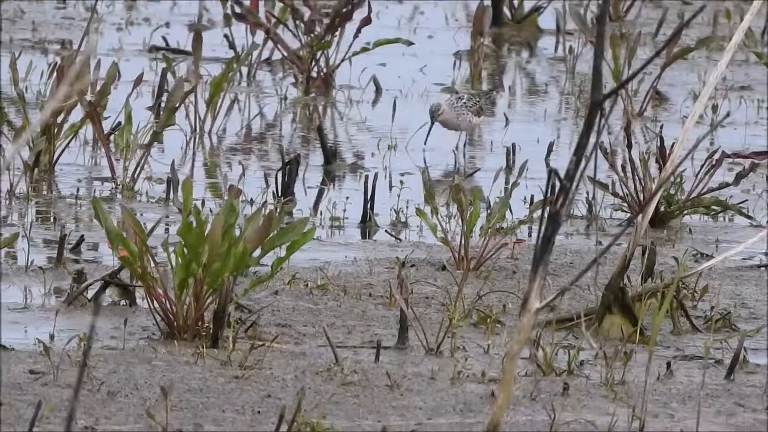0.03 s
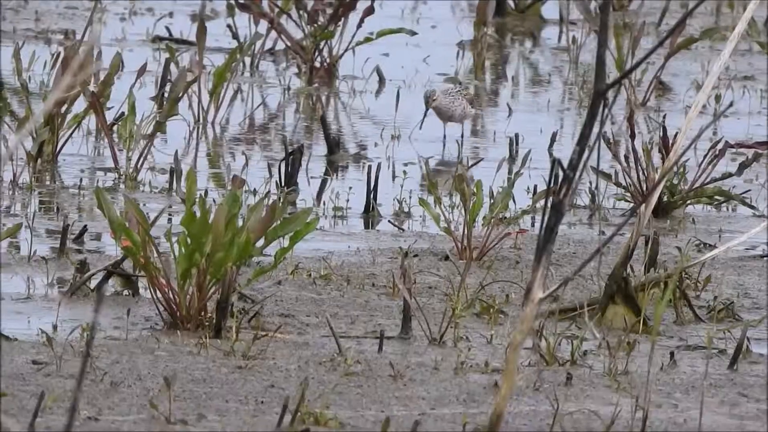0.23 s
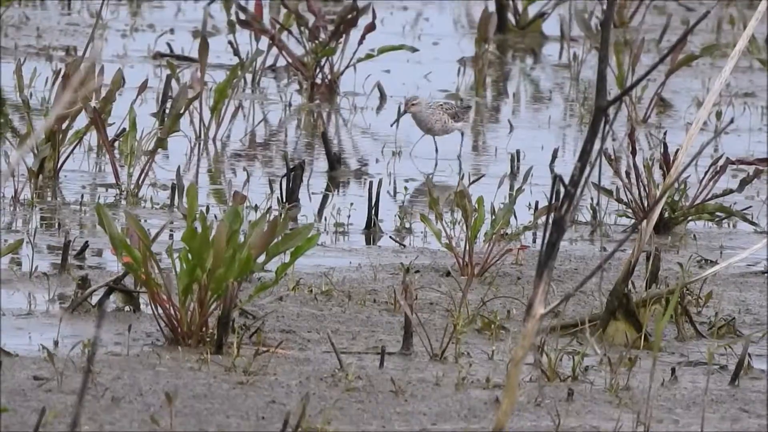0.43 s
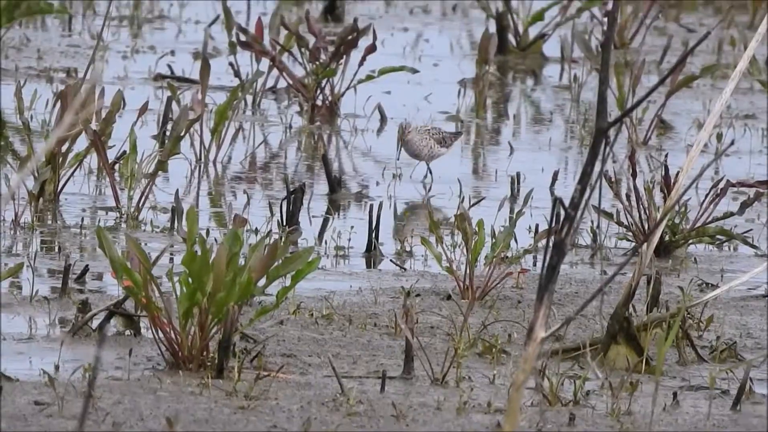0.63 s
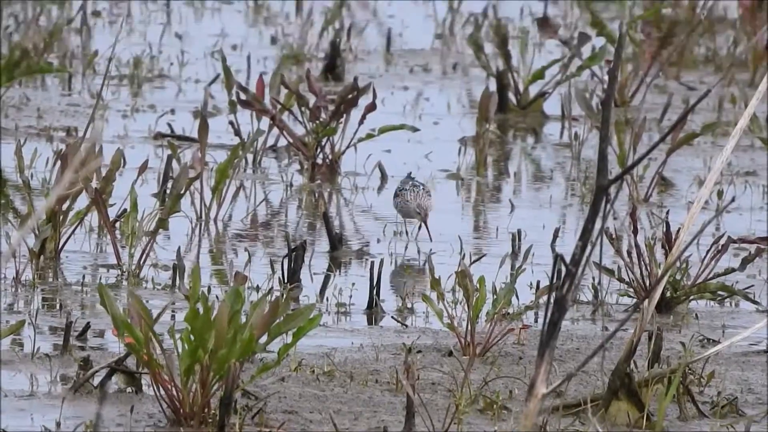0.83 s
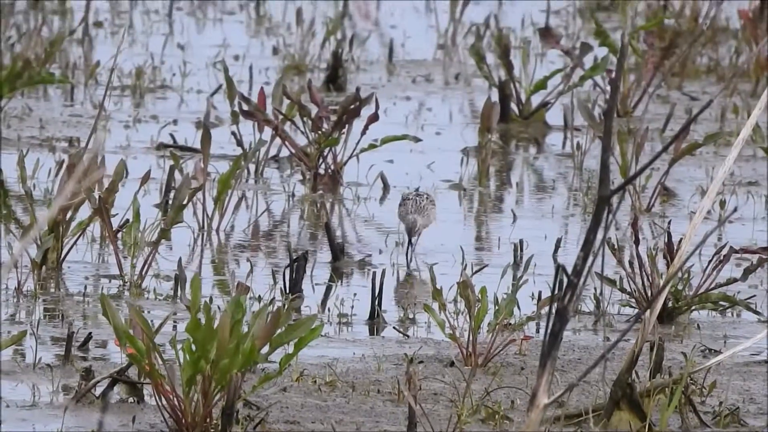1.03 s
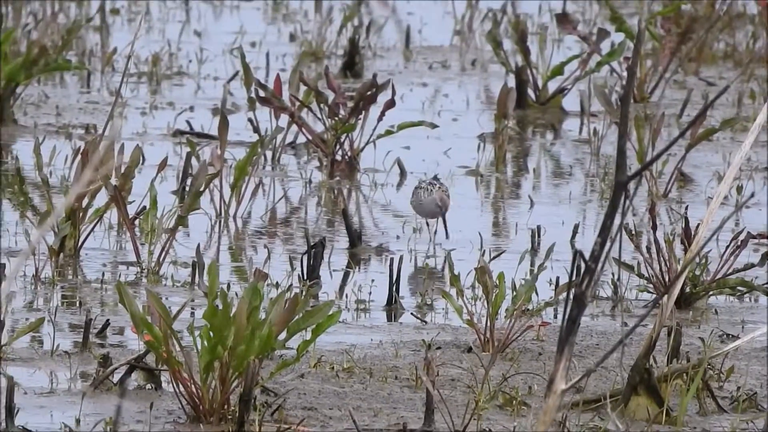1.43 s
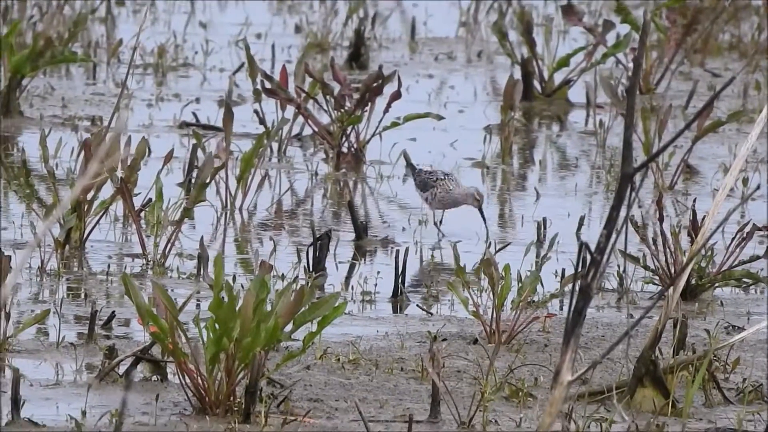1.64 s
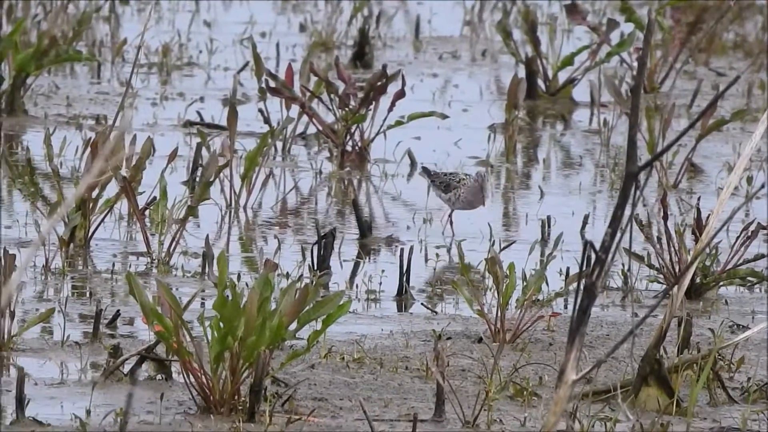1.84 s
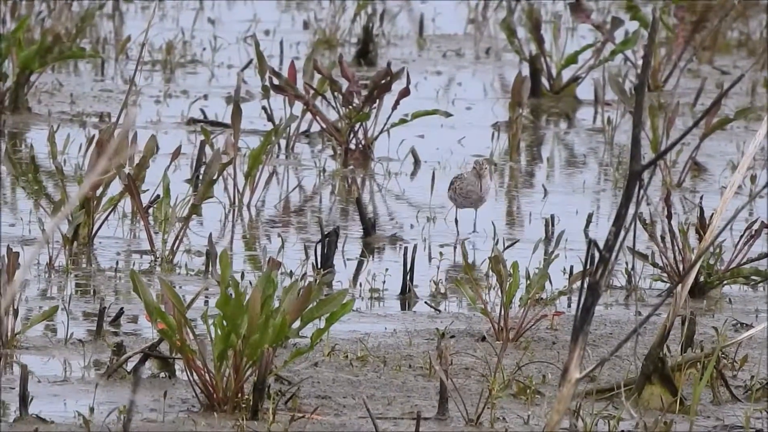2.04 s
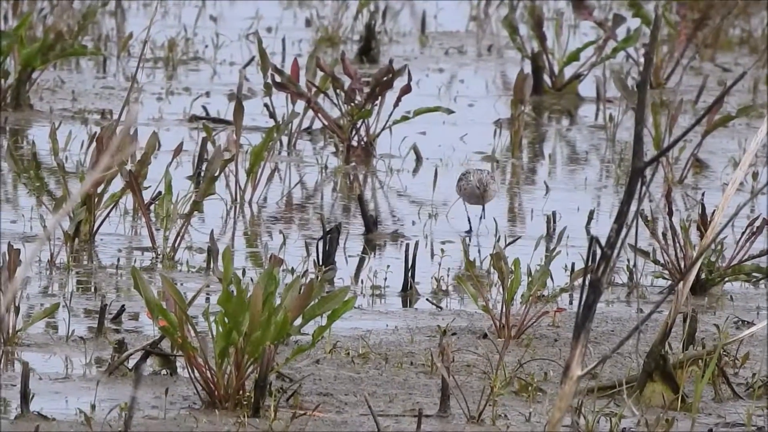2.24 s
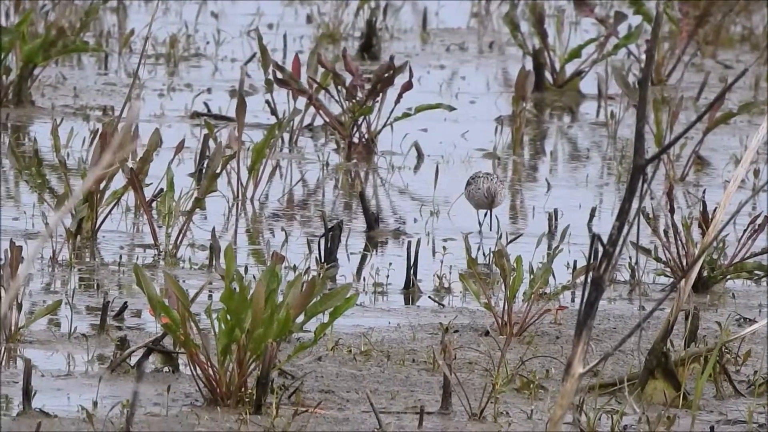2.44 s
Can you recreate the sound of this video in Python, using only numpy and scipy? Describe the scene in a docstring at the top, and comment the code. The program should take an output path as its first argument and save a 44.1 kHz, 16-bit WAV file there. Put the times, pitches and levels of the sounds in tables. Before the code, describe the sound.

A shorebird repeats a yip and a falling wail over wind buffeting the microphone.

```python
"""Shorebird at a windy marsh edge

A shorebird repeats a two-part call: a short arched yip, then a long wail that hiccups and slides down.
Its voice splits briefly near the top of the notes; reeds scatter a soft echo and other birds whistle
far off. Wind buffets the two microphone ports over a distant roar and a faint engine drone."""
import sys
import numpy as np
from scipy import signal
from scipy.fft import rfft, irfft, next_fast_len
from scipy.io import wavfile
from scipy.ndimage import uniform_filter1d, map_coordinates

SR = 44100
rng = np.random.default_rng(int(sys.argv[2]) if len(sys.argv) > 2 else 0)


def generate_wav(sig):
    """Save sig (samples, or channels by samples) to the path in sys.argv[1] as 16-bit PCM at SR."""
    pcm = np.round(np.clip(np.atleast_2d(sig).T, -1, 1) * 32767).astype(np.int16)
    wavfile.write(sys.argv[1], SR, pcm)


N = 114660

# Stereo spread of the voice, one per partial: (share of the note's pan [ratio])
PARTIAL_PAN = [0.51, 1.42, 0.58, -0.63, 1.3]
JITTER, YIP_JITTER, SHIMMER_DB = .0105, .014, 2.2  # roughness in pitch [ratio] and in level
def voice(pitch, gains, pan_db, jitter):
    """Four rough harmonics and, when the voice splits, a partial halfway between the second and third."""
    on = np.flatnonzero(gains[1] > 0)
    def flutter(rate):
        return np.interp(clock()[on] * rate, np.arange(2000), rng.standard_normal(2000))
    phase = 2 * np.pi * np.cumsum(pitch[on] * (1 + jitter * flutter(400))) / SR
    out = np.zeros((2, N))
    for ratio, gain, share in zip((1, 2, 3, 4, 2.5), gains, PARTIAL_PAN):
        level = np.sqrt(2) * gain[on] * amp(SHIMMER_DB * flutter(250))
        out[:, on] += panned(share * pan_db) * level * np.sin(ratio * phase)
    return out


# Yips: (start [s], length [s], peak time [s], peak pitch [Hz], second partial [dB], fundamental [dB],
# third partial [dB], split [dB], pan left [dB], tail [dB], pitch drop half a note from the peak [ratio])
YIPS = [(0.032, 0.037, .047, 2424, -51.5, -63, -56.5, -56, 5.5, -69, .09),
        (0.55, 0.037, .565, 2293, -46, -59.5, -48.5, -50, 6.5, -51, 0.097),
        (1.047, 0.037, 1.064, 2318, -39, -60, -46.5, -43, 7.5, -62, 0.088),
        (1.551, 0.034, 1.572, 2217, -50, -56, -62, -79, 5, -60, .06),
        (2.044, 0.05, 2.078, 2184, -48, -56.5, -59.5, -75, 3, -75, .07),
        (2.519, 0.057, 2.554, 2078, -46, -55, -60.5, -78, -2.5, -51, 0.059)]
TAIL_HZ, TAIL_S, TAIL_FADE_DB = 3785, 0.058, 8.5
def yips():
    """Each scratchy yip arches over its peak, where it splits, then dulls and trails off in a thin tone."""
    out = np.zeros((2, N))
    for start, length, peak_s, peak_hz, second_db, root_db, third_db, split_db, pan, tail_db, drop in YIPS:
        from_peak = (clock() - peak_s) / length
        arch = np.minimum((2 * from_peak) ** 2, 2)
        env = gate(start - .003, start + length + .007, edge=.012)
        second = amp(second_db - 4.9 * arch)
        third = amp(third_db - 4.5 * np.clip(from_peak, -1, 1))
        split = amp(split_db) * bell(peak_s + .0045, .0083)
        gains = [amp(root_db), second, third, third * amp(-18), split]
        out += voice(peak_hz * (1 - drop * arch), [env * g for g in gains], pan, YIP_JITTER)
        end = start + length + .0037
        fade_db = TAIL_FADE_DB * np.clip((clock() - end) / TAIL_S, 0, 1)
        tail = gate(end, end + TAIL_S, edge=.0054) * amp(tail_db - fade_db)
        out += panned(pan) * tail * tone(TAIL_HZ * (1 + JITTER * wobble(300)))
    return out


# One contour per wail: (time [s], pitch [Hz], second partial [relative dB], third partial [relative dB])
WAIL_CONTOURS = [
    [(0.178, 2331, -54, -65), (0.192, 2439, -43.5, -59), (0.208, 2320, -53.5, -55), (0.23, 2377, -58, -53),
     (0.244, 2290, -55, -55), (0.27, 2297, -47, -63), (0.288, 2260, -54, -50.5), (0.314, 2164, -59, -64),
     (0.336, 2048, -60, -57), (0.356, 1920, -50, -51.5), (0.364, 1844, -49.5, -59), (0.378, 1960, -60, -83)],
    [(0.685, 2246, -52, -61), (0.695, 2430, -41.5, -52), (0.717, 2290, -50, -60), (0.735, 2340, -54, -48),
     (0.753, 2308, -47, -48.5), (0.775, 2260, -46, -57), (0.813, 2200, -46.5, -49.5),
     (0.831, 2130, -47, -56), (0.851, 2045, -61, -52), (0.883, 1834, -44, -52.5), (0.9, 1956, -57, -77)],
    [(1.17, 2307, -84, -91), (1.176, 2375, -39, -60), (1.184, 2432, -39, -53), (1.19, 2382, -42, -67),
     (1.202, 2220, -78, -63), (1.216, 2350, -58, -56), (1.224, 2434, -43.5, -54), (1.252, 2258, -45, -65),
     (1.282, 2187, -54.5, -53.5), (1.328, 2165, -53, -60), (1.356, 1976, -63, -55),
     (1.382, 1810, -51, -55.5), (1.398, 1826, -53, -75)],
    [(1.66, 2204, -50, -73), (1.668, 2293, -51, -57), (1.676, 2260, -49, -71), (1.688, 2123, -58, -58),
     (1.7, 2049, -77, -70), (1.72, 2335, -56, -55), (1.74, 2280, -53, -60), (1.756, 2292, -52, -64),
     (1.778, 2210, -58, -62), (1.79, 2087, -52.5, -63), (1.83, 2010, -53.5, -53.5),
     (1.888, 1761, -58.5, -73)],
    [(2.138, 2168, -74, -73), (2.144, 2188, -50, -68), (2.152, 2168, -56, -58), (2.164, 2052, -54, -62),
     (2.176, 1963, -63, -77), (2.186, 2110, -56, -63), (2.198, 2262, -44.5, -48.5), (2.212, 2138, -58, -67),
     (2.242, 2169, -53, -52.5), (2.27, 2155, -54, -60), (2.29, 2057, -46.5, -56), (2.315, 1983, -58, -66),
     (2.352, 1850, -49, -63), (2.382, 1748, -49.5, -78), (2.394, 1870, -58, -82)],
]
# Character of each wail: (fundamental [dB], fourth partial [dB], pan left [dB], hiccup time [s],
# hiccup dip in the fundamental [dB], rasp centre [Hz], rasp level [dB])
WAIL_TIMBRES = [(-63, -67, 7, 0.24, -2, 4880, -51), (-57.5, -65, 7.5, 0.64, 7, 4800, -50),
                (-55, -71.5, 6, 1.204, 3, 4830, -50), (-52, -71, 3, 1.701, 20, 4760, -50),
                (-51, -68, 0.5, 2.175, 9, 4500, -56)]
# Cracks where a wail splits: (time [s], width [s], level [dB])
WAIL_SPLITS = [(0.206, 0.0039, -54), (.23, 0.0066, -58), (.739, 0.0031, -50), (1.227, 0.0039, -43),
               (1.248, 0.014, -49.5), (1.727, 0.004, -53), (1.758, 0.012, -58)]
ROOT_HOLD, ROOT_FADE_DB = 0.52, 22  # share of the note the fundamental holds; then its fall per note length
def wails():
    """Each long note hiccups, may split near its top and slides down hoarsely as its fundamental fades."""
    out = np.zeros((2, N))
    split = sum(amp(db) * bell(s, width) for s, width, db in WAIL_SPLITS)
    for contour, timbre in zip(WAIL_CONTOURS, WAIL_TIMBRES):
        root_db, fourth_db, pan, hiccup_s, hiccup_db, rasp_hz, rasp_db = timbre
        pitch, second_db, third_db = uniform_filter1d(curves(contour), round(.004 * SR), axis=1)
        start, end = contour[0][0], contour[-1][0]
        env = gate(start - .005, end + .006, edge=.015)
        late = np.clip((clock() - start) / (end - start) - ROOT_HOLD, 0, 1)
        root = amp(root_db - ROOT_FADE_DB * late - hiccup_db * bell(hiccup_s, width=.01))
        gains = [root, amp(second_db + 2), amp(third_db + 2), amp(fourth_db), split]
        out += voice(pitch, [env * g for g in gains], pan, JITTER)
        out += panned(pan) * rasp(start, end, rasp_hz, rasp_db)
    return out


RASP_HALF_WIDTH_HZ, RASP_SAG_HZ_PER_S, RASP_LINGER_S, RASP_FADE_DB_PER_S = 290, 1300, .05, 25
def rasp(start, end, centre_hz, db):
    """A hoarse noise band sags slowly from the top of the second partial as the note slides below it."""
    age = np.clip(clock() - start, 0, end - start + RASP_LINGER_S)
    band = filtered(rng.standard_normal((2, N)), lambda hz: 1 / (1 + (hz / RASP_HALF_WIDTH_HZ) ** 6))
    noise = unit(band * tone(centre_hz - RASP_SAG_HZ_PER_S * age))
    return noise * gate(start, end + RASP_LINGER_S, edge=.04) * amp(db - RASP_FADE_DB_PER_S * age)


# Early reflections off water and bank: (delay [s], level [dB])
BOUNCES = [(.0045, -18.5), (.013, -30)]
def water_bounce(x):
    """The direct sound and its reflections, which beat as the pitch glides."""
    return filtered(x, lambda hz: 1 + sum(amp(db) * np.exp(-2j * np.pi * hz * s) for s, db in BOUNCES))


# EQ of the echo from the reed bed, and from the nearest plants: (frequency [Hz], gain [dB])
REED_BED_EQ = [(2000, -29), (3500, -16), (4600, 0.5), (5600, -12), (7000, -23), (10000, -27)]
NEAR_REED_EQ = [(2000, -15), (3600, -3.5), (4200, -18), (4700, -19), (5300, -8), (7000, -3), (10000, -7.5)]
ECHO_BLUR_HZ, PREDELAY_S = 260, 0.0073
def reed_echo(x, db, t60, eq):
    """Plants scatter a diffuse echo that blurs the pitch, different at each port and moment to moment."""
    blurred = x.mean(0) * unit(wobble(2 * ECHO_BLUR_HZ))
    t = clock()[:SR // 2]
    wet = np.zeros((2, N))
    hop_s = .2
    for centre in np.arange(0, N / SR + hop_s, hop_s):  # each overlapping slice gets its own tail
        part = blurred * np.sqrt(np.maximum(1 - abs(clock() - centre) / hop_s, 0))
        tail = rng.standard_normal((2, len(t))) * amp(-60 * t / t60) * (t > PREDELAY_S)
        tail /= np.linalg.norm(tail[0])
        first = max(round((centre - hop_s) * SR), 0)
        echo = signal.fftconvolve(part[None, first:first + len(t)], tail, axes=1)[:, :N - first]
        wet[:, first:first + echo.shape[1]] += echo
    return amp(db) * filtered(wet, lambda hz: amp(along(eq, hz)))


# Wind thumps: (time [s], width [s], centre [Hz], left level [dB], right level [dB])
THUMPS = [(0.045, 0.0046, 235, -58, -34.5), (0.202, 0.005, 163, -35, -29), (0.289, 0.0096, 150, -50, -32.5),
          (0.414, 0.0045, 138, -27, -30.5), (.594, 0.005, 188, -46, -30.5), (0.704, 0.0029, 174, -50, -16),
          (0.714, 0.0038, 132, -50, -19.5), (0.722, 0.0034, 360, -37, -25), (0.7688, 0.0036, 300, -50, -16),
          (.769, .003, 620, -60, -31), (0.889, 0.0033, 189, -50, -23.5), (1.112, 0.0071, 202, -26.5, -28.5),
          (1.17, 0.0056, 197, -63, -22.5), (1.346, 0.008, 161, -29.5, -27), (1.388, 0.004, 135, -33, -24),
          (1.462, 0.007, 170, -18.5, -18.5), (1.478, 0.0043, 157, -21.5, -28.5),
          (1.55, 0.0028, 232, -51, -17), (1.641, 0.0045, 165, -26, -21.5),
          (1.658, 0.0083, 145.3, -18, -15.5), (1.735, 0.0074, 161, -23, -23.5),
          (1.764, 0.0066, 169, -25.5, -27), (1.867, 0.0045, 190, -30, -32.5),
          (2.114, 0.0078, 110, -35, -63), (2.227, 0.0031, 175, -25.5, -64)]
PUFF_DB, PUFF_OCTAVES, PUFF_TOP_HZ = -8, 0.92, 560
RIGHT_LAG_CYCLES, SCATTER_CYCLES = .26, .05
def wind_thumps():
    """Single eddies give each port a few cycles of low swing and a puff of broader noise."""
    out = np.zeros((2, N))
    for s, width, centre_hz, left_db, right_db in THUMPS:
        def puff_band(hz):
            octaves = np.log2((hz + 1) / centre_hz)
            return 1 / (1 + (octaves / PUFF_OCTAVES) ** 2) ** 1.04 / (1 + (hz / PUFF_TOP_HZ) ** 2)
        env = bell(s, width)
        cycles = centre_hz * (clock() - s) + rng.random()
        port_offset = SCATTER_CYCLES * rng.standard_normal((2, 1)) - [[0], [RIGHT_LAG_CYCLES]]
        swing = env * np.sin(2 * np.pi * (cycles + port_offset))
        puff = filtered(env * rng.standard_normal((2, N)), puff_band)
        puff *= np.linalg.norm(env) / np.linalg.norm(puff, axis=1, keepdims=True)
        out += amp([[left_db], [right_db]]) * (swing + amp(PUFF_DB) * puff)
    return out


# Gusts on each port: (time [s], relative level [dB])
GUSTS_LEFT = [(.12, -56.5), (.2, -39), (.28, -53), (.43, -43), (.52, -47), (.75, -44.5), (.98, -53),
              (1.1, -41.5), (1.28, -50), (1.36, -41.5), (1.47, -40.5), (1.55, -44), (1.62, -34),
              (1.76, -38), (1.84, -49.5), (2.2, -43), (2.4, -55), (2.6, -66)]
GUSTS_RIGHT = [(0, -60), (.12, -54.5), (.2, -43.5), (.36, -48), (.43, -38), (.52, -41.5), (.7, -41.5),
               (.9, -41.5), (1.12, -35.5), (1.29, -51), (1.37, -38.5), (1.66, -35.5), (1.83, -42.5),
               (2.0, -52), (2.6, -58)]
# Bass-heavy wind EQ: (frequency [Hz], gain [dB])
WIND_EQ = [(20, -57), (40, -20.5), (65, -12), (95, -10), (125, -3), (165, -1.5), (220, -7.5), (320, -11),
           (500, -21.5), (1000, -30.5), (3000, -45.5), (8000, -65)]
def wind_rumble():
    """Wind buffets the ports with a lumpy rumble, almost unrelated from left to right."""
    gust_db = np.array([curves(rows)[0] + 2 * wobble(35.1) for rows in (GUSTS_LEFT, GUSTS_RIGHT)])
    return amp(gust_db + 2) * stereo_noise(WIND_EQ, correlation=[(100, 0.061)])


# Clicks: (time [s], level [dB])
TICKS = [(1.677, -46), (1.742, -47), (2.476, -38)]
# Crisp click EQ: (frequency [Hz], gain [dB])
TICK_EQ = [(500, -9), (2000, 10), (3500, -2), (5300, 8), (6500, 2), (9000, -13), (15000, -26)]
TICK_DECAY_S = 0.00056
def ticks():
    """Tiny dry clicks close by, each a spike of bright noise."""
    env = np.zeros(N)
    for s, db in TICKS:
        age = clock() - s
        env += amp(db) * np.exp(-abs(age) / TICK_DECAY_S) * (age > -TICK_DECAY_S / 2)
    return env * stereo_noise(TICK_EQ, correlation=[(1000, 0.5)])


# Far whistles: (start [s], length [s], first pitch [Hz], middle pitch [Hz], last pitch [Hz], level [dB])
WHISTLES = [(0.1, 0.06, 3030, 2960, 2980, -73), (2.055, 0.15, 3580, 3490, 3470, -63.5),
            (2.3, 0.08, 2950, 2470, 3120, -63.5)]
def far_birds():
    """Thin whistles, each bending through three pitches and fluttering as it fades."""
    out = np.zeros(N)
    for start, length, first, middle, last, db in WHISTLES:
        progress = np.clip((clock() - start) / length, 0, 1)
        bend = np.polyfit([0, .5, 1], [first, middle, last], 2)
        pitch = np.polyval(bend, progress) * (1 + .008 * wobble(300))
        level = amp(db - 2 * (progress - .5) + 2.5 * wobble(90))
        out += level * gate(start, start + length, edge=.0077) * tone(pitch)
    return np.array([out, out])


# Fader rides for the whole roar and for its treble: (time [s], relative level [dB])
ROAR_RIDE = [(0, -70.5), (.1, -56.5), (.3, -53), (.7, -48.5), (1.3, -50), (1.9, -49), (2.25, -46),
             (2.6, -49.5)]
ROAR_TREBLE_RIDE = [(0, 4), (.15, -8), (.25, 3), (.6, -0.5)]
# Dark roar EQ: (frequency [Hz], gain [dB])
ROAR_EQ = [(60, -28), (150, 6.5), (300, -1.5), (450, -5), (650, 0.5), (880, 5.5), (1050, -3), (1300, -5.5),
           (1700, -10.5), (2200, -24), (3000, -30), (6000, -50)]
# Narrow stereo image: (frequency [Hz], left-right correlation [ratio])
ROAR_IMAGE = [(100, .6), (500, .93), (2000, .9)]
ROAR_TREBLE_HZ = 1010
def distant_roar():
    """A dull bed of noise swells in, a little to the left; its treble dips briefly near the start."""
    level = amp(curves(ROAR_RIDE)[0] + 4 + .26 * wobble(18))
    roar = panned(2) * level * stereo_noise(ROAR_EQ, ROAR_IMAGE)
    treble = filtered(roar, lambda hz: 1 - 1 / (1 + (hz / ROAR_TREBLE_HZ) ** 10))
    return roar + (amp(curves(ROAR_TREBLE_RIDE)[0]) - 1) * treble


# Airy hiss EQ: (frequency [Hz], gain [dB])
HISS_EQ = [(1000, -28), (2500, -1.5), (3300, -1.5), (4400, 4.5), (5300, -1), (6500, 0.5), (8000, -5.5),
           (10000, -10), (13000, -13.5), (15500, -17.5)]
# Wide stereo image: (frequency [Hz], left-right correlation [ratio])
HISS_IMAGE = [(2000, 0.36), (5000, 0.15), (12000, 0.051)]
HISS_DB = -55.5
def hiss():
    """Faint, airy noise fades up and holds."""
    return amp(HISS_DB - 10 * np.exp(-clock() / .38)) * stereo_noise(HISS_EQ, HISS_IMAGE)


# Engine tones: (pitch [Hz], relative level [dB])
ENGINE_TONES = [(446, -60), (534, -58.5), (627, -59)]
# Fader ride for the engine: (time [s], gain [dB])
ENGINE_RIDE = [(0, -8.5), (.35, -7), (1.2, -4), (1.6, -8), (2.6, -11.5)]
def engine_drone():
    """A far engine hums on three tones, each wavering in level and pitch."""
    drone = np.zeros(N)
    for hz, db in ENGINE_TONES:
        drone += amp(db + 6.2 * wobble(7.64)) * tone(hz * (1 + .00957 * wobble(15)))
    return drone * amp(curves(ENGINE_RIDE)[0])


def amp(db):
    """Decibels to gain."""
    return 10 ** (np.asarray(db) / 20)


def unit(x):
    """Scale to rms 1."""
    return x / np.sqrt(np.mean(x ** 2) + 1e-20)


def panned(db):
    """Stereo gains with the left louder by db."""
    return unit(amp([[db / 2], [-db / 2]]))


def clock():
    """The time of every sample."""
    return np.arange(N) / SR


def tone(pitch):
    """A sine of rms 1 that follows a pitch curve in Hz."""
    return np.sqrt(2) * np.sin(2 * np.pi * np.cumsum(pitch) / SR)


def gate(start, end, edge):
    """A smooth rise, hold and fall, with fades of edge seconds."""
    ramp = np.clip(np.minimum(clock() - start, end - clock()) / edge, 0, 1)
    return np.sin(np.pi / 2 * ramp) ** 2


def bell(centre, width):
    """A bell-shaped swell."""
    return np.exp(-.5 * ((clock() - centre) / width) ** 2)


def along(points, hz):
    """Read (frequency, value) points on a log axis."""
    freqs, values = np.transpose(points)
    return np.interp(np.log(hz + 1), np.log(freqs + 1), values)


def curves(rows):
    """An automation curve for each column after the time."""
    times, *columns = np.transpose(rows)
    return np.array([np.interp(clock(), times, column) for column in columns])


def wobble(rate):
    """A smooth random curve, rate knots a second."""
    return map_coordinates(rng.standard_normal(int(N * rate / SR) + 4), [clock() * rate])


def filtered(x, response):
    """Shape x by a frequency response."""
    size = next_fast_len(N + SR // 2)
    return irfft(rfft(x, size) * response(np.fft.rfftfreq(size, 1 / SR)), size)[..., :N]


def stereo_noise(eq, correlation):
    """Coloured mid-side noise of rms 1."""
    def mid_side(hz):
        width = np.arccos(np.clip(along(correlation, hz), -1, 1)) / 2
        return amp(along(eq, hz)) * [np.cos(width), np.sin(width)]
    mid, side = filtered(rng.standard_normal((2, N)), mid_side)
    return unit(np.array([mid + side, mid - side]))


LEFT_LEAD_S = 2.5e-5  # the left port hears far sounds earlier
def scene():
    """Birds and far sounds from slightly to the left, wind and clicks at the microphone."""
    birds = water_bounce(yips() + wails()) + far_birds()
    far = birds + distant_roar() + hiss() + engine_drone()
    far = filtered(far, lambda hz: np.exp(1j * np.pi * hz * LEFT_LEAD_S * np.array([[1], [-1]])))
    echo = reed_echo(birds, db=-3.5, t60=.65, eq=REED_BED_EQ)
    echo += panned(8.5) * reed_echo(birds, db=-3, t60=.18, eq=NEAR_REED_EQ)
    return far + echo + wind_rumble() + wind_thumps() + ticks()


TOP_HZ = 15750
def record(dry):
    """A brick-wall low-pass trims the highest treble."""
    return filtered(dry, lambda hz: hz < TOP_HZ)


dry = scene()
out = record(dry)
generate_wav(out)
```